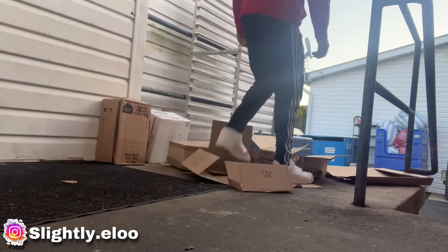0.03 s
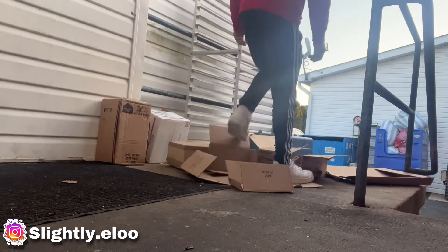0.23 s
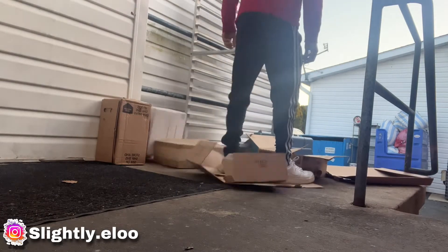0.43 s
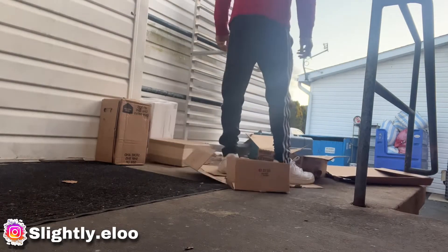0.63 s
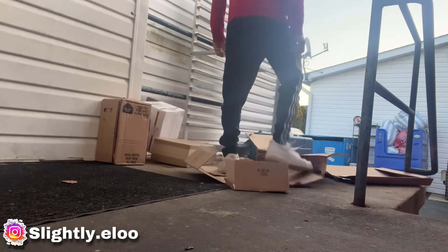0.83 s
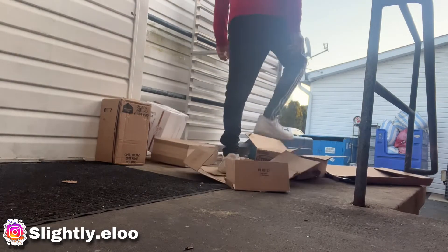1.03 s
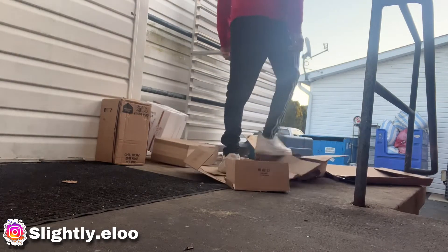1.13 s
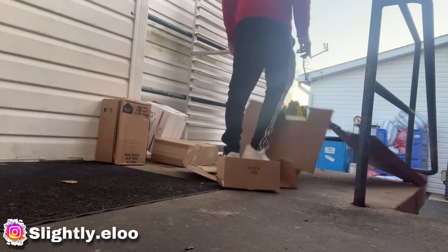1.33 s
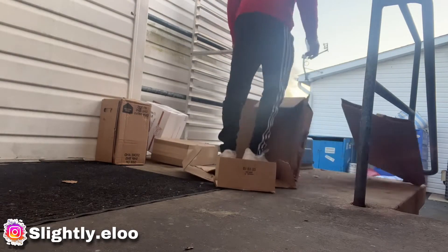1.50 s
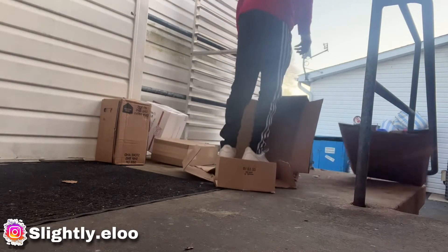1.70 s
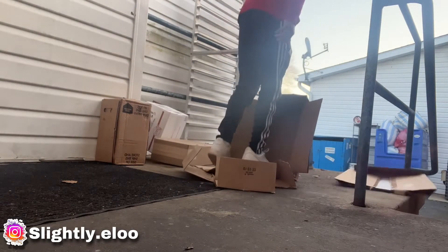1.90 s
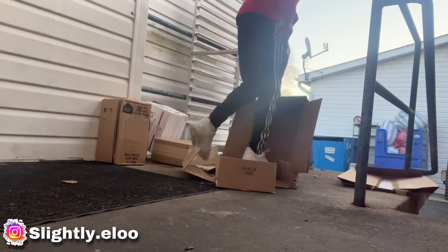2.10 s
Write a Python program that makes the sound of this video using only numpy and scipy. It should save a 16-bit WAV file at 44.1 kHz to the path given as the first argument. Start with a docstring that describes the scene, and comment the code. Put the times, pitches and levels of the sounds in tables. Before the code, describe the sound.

Two stomps crush cardboard boxes, with crackling folds and shoe scuffs in between.

```python
"""A concrete porch beside a house wall, a stereo pair of microphones close to some cardboard boxes.
Two stomps flatten them: the panels knock and buckle, the flutes crackle and ping, creases snap
and trapped air thumps out. Between the stomps the shoes scuff over the card.
Floor and walls return a short echo; a low outdoor rumble lies underneath."""
import sys
import numpy as np
from scipy import signal
from scipy.fft import rfft, irfft
from scipy.io import wavfile
from scipy.ndimage import uniform_filter1d

SR = 44100
rng = np.random.default_rng(int(sys.argv[2]) if len(sys.argv) > 2 else 0)


def master(y):
    """Save y as 16-bit WAV."""
    cut = np.clip(np.atleast_2d(y).T, -1, 1)
    pcm = np.round(cut * 32767)  # scale
    wavfile.write(sys.argv[1], SR, pcm.astype(np.int16))


N = 94815
T = np.arange(N) / SR
SHORT = np.arange(SR // 2) / SR  # time axis of one blow or echo

# outdoor rumble: (frequency [Hz], relative level [dB])
RUMBLE_SPECTRUM = [(27, -5.5), (40, -16), (60, 3.5), (100, -6), (170, -3), (280, -18.5), (2000, -41),
                   (14000, -58.5)]
# decay of the porch's echo: (frequency [Hz], t60 [s])
ECHO_DECAY = [(200, 0.452), (2500, 0.265), (14000, 0.475)]
# a shoe presses or scuffs the card: (time [s], rise [s], hold [s], 20 dB fade [s],
# flute crackle [dB], fold crunch [dB], panel flexing [dB])
SHOE_PRESSES = [(0.108, .004, .015, .045, -44, -37, -33), (0.271, 0.03, 0.0998, 0.1383, -22, -26, -22.5),
                (0.291, 0.00585, 0.1503, 0.144, -30.5, -21.5, -17),
                (0.563, 0.0077, 0.0212, 0.1831, -38.5, -37, -26),
                (0.771, 0.01, 0.0155, 0.0713, -37.5, -35.5, -33),
                (0.829, 0.0368, 0.008, 0.1777, -46, -46, -37.5),
                (1.109, 0.00291, 0.0393, 0.1785, -34.5, -26.5, -20.5),
                (1.167, 0.1086, 0.0806, 0.1043, -30, -32, -28),
                (1.269, 0.0461, 0.0537, 0.0855, -40.5, -28.5, -29.5),
                (1.436, 0.0027, 0.008, 0.1388, -40, -42.5, -39.5), (1.628, .02, .075, .05, -45, -41, -42),
                (1.726, 0.00504, 0.0166, 0.0149, -44, -32, -26.5),
                (1.848, 0.0426, 0.0274, 0.0671, -36, -37.5, -36.5),
                (1.89, 0.035, 0.044, 0.0043, -50, -36.5, -24), (2.043, .02, .012, .04, -48, -57, -46)]
# crackling flutes: (frequency [Hz], relative level [dB])
FLUTE_SPECTRUM = [(1000, -20), (1900, -6), (2800, -0.5), (3500, -5), (4600, -4.5), (6500, -4), (7800, -14),
                  (10000, -14.5), (13500, -26.5)]
# crunching folds: (frequency [Hz], relative level [dB])
FOLD_SPECTRUM = [(260, -18.5), (520, 2.5), (720, -1.5), (1100, -2), (1600, -12), (2600, -24)]
# flexing panels: (frequency [Hz], relative level [dB])
PANEL_SPECTRUM = [(80, -22), (150, -2), (215, 0), (262, -7), (330, -0.5), (480, -9.5), (800, -26.5)]
# the shoe taps stiff card: (time [s], level [dB], ring length [share of a free ring])
SHOE_TAPS = [(0.1117, -23, .7), (0.2148, -19, 1)]
# modes of the tapped card: (pitch [Hz], relative level [dB], t60 [s])
CARD_MODES = [(564, 3, .06), (832.3, -5, .025), (1080, -1, .025)]
# air is pressed out of a box: (time [s], level [dB], pitch [Hz])
AIR_THUMPS = [(0.231, -19.5, 81.6), (0.332, -11.5, 106.7), (0.376, -13.5, 67.63), (0.442, -10, 72.86),
              (0.597, -17, 69.8), (1.152, -14, 135), (1.389, -18, 68.8)]
# creases give way: (time [s], ring level [dB], pitch [Hz], crack level [dB])
CREASE_SNAPS = [(0.2414, -31, 5234, -17), (0.303, -17.5, 2920, -6.5), (0.342, -21.5, 4530, -13),
                (0.3867, -4, 2797, -3), (0.4316, -19, 2715, -10.5), (0.857, -23, 4870, -11.5),
                (1.1117, -19, 2960, -9), (1.131, -13.5, 634, -7), (1.2524, -19, 4834, -13),
                (1.334, -10, 988, -6), (1.441, -26, 5500, -9.5), (1.709, -28, 5200, -22),
                (1.7329, -26, 5130, -17.5), (1.9045, -27.5, 5360, -15), (1.972, -20, 751, -21.5)]
# blows on the panels: (time [s], level [dB], pitch [Hz], t60 [s])
PANEL_KNOCKS = [(0.1156, -21, 222.4, 0.309), (0.219, -19, 211, 0.123), (0.294, -12, 480, .06),
                (0.3167, -8, 322.7, 0.072), (0.3495, -8.5, 201.2, 0.063), (0.3716, -8.5, 370, 0.098),
                (0.536, -15, 162, 0.155), (0.577, -21, 490, .09), (1.113, -11, 290.3, .07),
                (1.1262, -4.5, 242.3, 0.1153), (1.1435, -4, 310, 0.1583), (1.15, -9, 203.7, 0.196),
                (1.4456, -8.5, 217.8, 0.084), (1.5164, -8, 264, 0.0575), (1.5313, -17, 285.5, 0.0975),
                (1.7328, -24, 390, .12), (1.755, -24, 191.4, .12), (1.952, -19, 230.7, 0.112)]

CRACK_DECAY_S = 0.0021
RING_CYCLES = 25.8  # a flute or crease rings this many periods while it falls 60 dB


def from_db(db):
    """Decibels to gain."""
    return 10 ** (np.asarray(db) / 20)


def at_hz(points, hz):
    """Read a table on a log-frequency axis."""
    freqs, values = np.transpose(points)
    return np.interp(np.log(hz + 1e-3), np.log(freqs), values)


def colour(x, spectrum):
    """Causal filter with the given spectrum, falling away above its last point; unit power gain."""
    size = 2 ** 13
    hz = np.arange(size // 2 + 1) * SR / size
    gain = from_db(at_hz(spectrum, hz)) / np.maximum(hz / spectrum[-1][0], 1) ** 3
    cepstrum = irfft(np.log(gain))
    cepstrum[1:size // 2] *= 2  # fold to minimum phase
    cepstrum[size // 2 + 1:] = 0
    response = irfft(np.exp(rfft(cepstrum)))
    return signal.fftconvolve(x, response[None] / np.linalg.norm(response), axes=1)[:, :N]


def lowpass(x, hz):
    """Second-order low-pass."""
    return signal.sosfilt(signal.butter(2, min(hz, .45 * SR), fs=SR, output="sos"), x + 1e-18)


def ring(x, hz, t60):
    """Resonator: a unit click sets a sine of height 1 ringing."""
    radius = np.exp(-np.log(1000) / (t60 * SR))
    angle = 2 * np.pi * hz / SR
    return signal.lfilter([0, np.sin(angle)], [1, -2 * radius * np.cos(angle), radius ** 2], x + 1e-18)


def click(db):
    """One impulse."""
    return from_db(db) * (SHORT == 0)


def burst(decay_s):
    """A dying puff of noise with unit energy."""
    puff = rng.standard_normal(len(SHORT)) * np.exp(-np.minimum(SHORT / decay_s, 20))
    return puff / np.linalg.norm(puff)


def add(out, at_s, x):
    """Mix a short sound in at its time."""
    start = int(at_s * SR)
    out[start:start + len(x)] += x[:N - start]


def envelope(at_s, rise_s, hold_s, fade_s):
    """Straight rise, hold, then a fall of 20 dB per fade time."""
    age = T - at_s
    return np.clip(age / rise_s, 0, 1) * 10 ** (-np.maximum(age - rise_s - hold_s, 0) / fade_s)


def wobble(per_s):
    """Random values joined by straight lines."""
    return np.interp(T * per_s, np.arange(N), rng.standard_normal(N))


def diffuse(size, alike_hz):
    """Noise from all around: alike at both microphones in the bass, unrelated in the treble."""
    mid, side = rfft(rng.standard_normal((2, size)))
    hz = np.arange(len(mid)) * SR / size
    alike = 1 / (1 + (hz / alike_hz) ** 3)
    return irfft(np.sqrt((1 + alike) / 2) * mid + np.sqrt((1 - alike) / 2) * side * [[1], [-1]], size)


def outdoor_rumble(level_db=-31.5):
    """The steady low background of the open air around the porch."""
    return from_db(level_db) * colour(diffuse(N, alike_hz=333), RUMBLE_SPECTRUM)


def porch_echo(early_db=-8.5, early_s=0.01303, tail_db=-11.5, wall_delay_s=.003, alike_hz=304):
    """Quick scatter from the nearby floor and boxes, then the tail between the walls."""
    size = len(SHORT)
    hz = np.arange(size // 2 + 1) * SR / size
    noise = rfft(diffuse(size, alike_hz))
    tail = 0
    for band_hz, t60 in ECHO_DECAY:
        band = at_hz([(f, f == band_hz) for f, _ in ECHO_DECAY], hz)
        tail += irfft(noise * band, size) * np.exp(-np.log(1000) * SHORT / t60)
    tail *= np.sqrt(2 * np.log(1000) / (ECHO_DECAY[1][1] * SR))
    early = diffuse(size, alike_hz) * np.exp(-SHORT / early_s) * np.sqrt(2 / (early_s * SR))
    echo = from_db(tail_db) * tail + from_db(early_db) * early
    return np.pad(echo, ((0, 0), (int(wall_delay_s * SR), 0)))


def at_microphones(x, left_db, change_foot_s=0.9995):
    """Direct sound and porch echo at the pair, as the work moves from the left foot to the right."""
    left_foot_s, right_foot_s = -.00072, .00043  # lag of the left microphone behind the right
    on_right_foot = (1 + np.tanh(20 * (T - change_foot_s))) / 2
    lag_s = left_foot_s + (right_foot_s - left_foot_s) * on_right_foot
    left = np.interp(np.arange(N) - np.round(lag_s * SR), np.arange(N), x[0])
    direct = np.array([left, x[1]])
    echo = signal.fftconvolve(x, porch_echo(), axes=1)[:, :N]
    return (direct + echo) * from_db([[left_db / 2], [-left_db / 2]])


def shoe_taps(sole_hz=1300):
    """Woody taps, dulled by the rubber sole, which damps the ring when it stays down."""
    out = np.zeros(N)
    for at_s, db, ring_share in SHOE_TAPS:
        modes = sum(ring(click(db + mode_db), hz, t60 * ring_share) for hz, mode_db, t60 in CARD_MODES)
        add(out, at_s, modes)
    return lowpass(out, sole_hz)


def shoe_pressure():
    """How hard the shoes work the card over time; three rows: flutes, folds, panels."""
    return sum(np.outer(from_db(press[4:]), envelope(*press[:4])) for press in SHOE_PRESSES)


def crumple(pressure, spectrum, peak_per_s, gain_db, spread_db=3.5, scatter_s=.0002):
    """Countless tiny collapses of uneven size, spread over the box; the card gives way in fits."""
    fits_db = 1.94 * wobble(per_s=110)
    sizes = from_db(spread_db * np.minimum(rng.exponential(1, N), 4)) * rng.choice([-1, 1], N)
    per_s = peak_per_s * (pressure / pressure.max()) ** .4  # a light press breaks fewer flutes
    right = sizes * (rng.random(N) < per_s / SR)
    lags = np.round(scatter_s * SR * rng.standard_normal(N)).astype(int)  # between the microphones
    left = np.bincount((np.arange(N) + lags) % N, right, N)
    grains = colour(np.array([left, right]), spectrum)
    running_rms = np.sqrt(uniform_filter1d(np.mean(grains ** 2, axis=0), size=1100) + 1e-6)
    return pressure * from_db(gain_db + fits_db) * grains / running_rms


def flute_pings(pressure, per_s=160, gain_db=-2.5, spread_db=3):
    """Single flutes burst, each ringing briefly at one of twenty pitches."""
    pitches_hz = np.geomspace(1917, 6986, 20)
    sizes = pressure * from_db(gain_db + spread_db * np.minimum(rng.exponential(1, N), 3))
    pops = sizes * (rng.random(N) < per_s / SR)
    pitch_index = rng.integers(0, len(pitches_hz), N)
    return sum(ring(pops * (pitch_index == k), hz, RING_CYCLES / hz) for k, hz in enumerate(pitches_hz))


def hollow_boom(at_s=.29, start_hz=280.4, end_hz=145.07, sink_s=.028, level_db=-15):
    """The air space of the first box booms; its note sinks and flutters as the walls go slack."""
    hz = end_hz + (start_hz - end_hz) * np.exp(-np.maximum(T - at_s, 0) / sink_s)
    waver_rad = 0.592 * wobble(per_s=65)
    flutter_db = 2.5 * wobble(per_s=65)
    note = np.sin(2 * np.pi * np.cumsum(hz) / SR + waver_rad)
    swell = envelope(at_s, rise_s=0.0477, hold_s=0.1067, fade_s=0.138)
    return from_db(level_db + flutter_db) * swell * note


def air_thumps(soften_hz=251):
    """Soft low puffs from the collapsing cavity, the same at both microphones."""
    out = np.zeros(N)
    for at_s, db, hz in AIR_THUMPS:
        add(out, at_s, ring(lowpass(click(db), soften_hz), hz, t60=0.277))
    return out


def crease_snaps():
    """A crease breaks with a broad crack and a brief ring."""
    out = np.zeros(N)
    for at_s, ring_db, hz, crack_db in CREASE_SNAPS:
        crack = from_db(crack_db) * lowpass(burst(CRACK_DECAY_S), 1.76 * hz)
        add(out, at_s, crack + ring(click(ring_db), hz, RING_CYCLES / hz))
    return out


def panel_knocks(bend_s=0.00122, contact_db=5.5):
    """Each blow lands with a dull contact and bends a panel, which swells and rings at its own pitch."""
    out = np.zeros(N)
    swell = 1 - np.exp(-SHORT / bend_s)
    for at_s, db, hz, t60 in PANEL_KNOCKS:
        contact = from_db(db + contact_db) * lowpass(burst(CRACK_DECAY_S), 2.2 * hz)
        add(out, at_s, contact + swell * ring(click(db), hz, t60))
    return out


def scene():
    """The boxes close in front of the pair, panels a little left, folds a little right, rumble behind."""
    on_flutes, on_folds, on_panels = shoe_pressure()
    flutes = crumple(on_flutes, FLUTE_SPECTRUM, peak_per_s=5000, gain_db=-5)
    flutes += flute_pings(on_flutes) + crease_snaps()
    folds = crumple(on_folds, FOLD_SPECTRUM, peak_per_s=1500, gain_db=-2.5) + shoe_taps()
    panels = crumple(on_panels, PANEL_SPECTRUM, peak_per_s=600, gain_db=-4.5)
    panels += panel_knocks() + hollow_boom()
    return (outdoor_rumble() + air_thumps()
            + at_microphones(flutes, left_db=1)
            + at_microphones(folds, left_db=-2.5)
            + at_microphones(panels, left_db=4))


def record(dry, low_cut_hz=38, high_cut_hz=14000):
    """The deepest bass is thinned, the highest peaks are rounded and the top is cut."""
    thinned = signal.sosfilt(signal.butter(2, low_cut_hz, "high", fs=SR, output="sos"), dry)
    rounded = thinned / (1 + thinned ** 6) ** (1 / 6)
    return signal.sosfilt(signal.ellip(10, .2, 80, high_cut_hz, fs=SR, output="sos"), rounded)


dry = scene()
out = record(dry)
master(out)
```